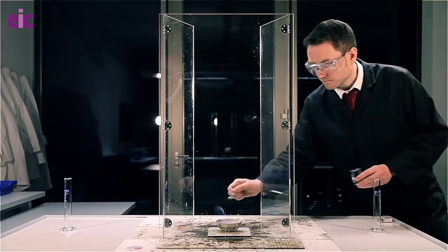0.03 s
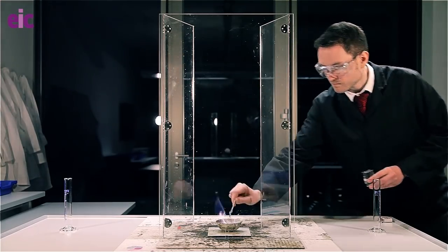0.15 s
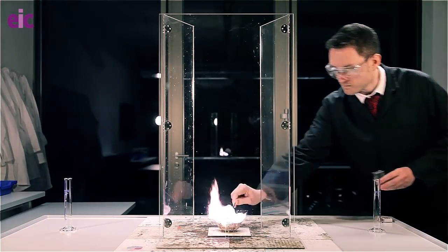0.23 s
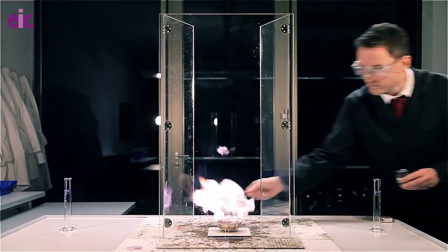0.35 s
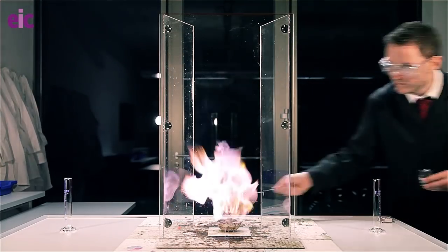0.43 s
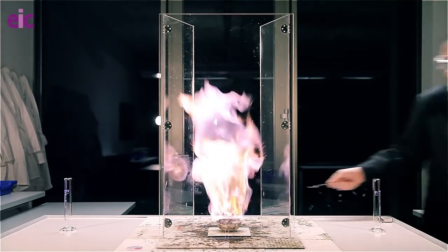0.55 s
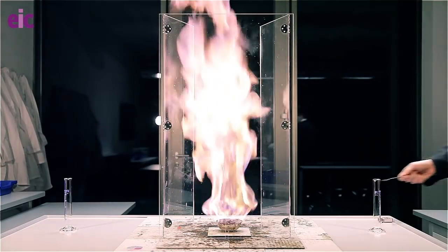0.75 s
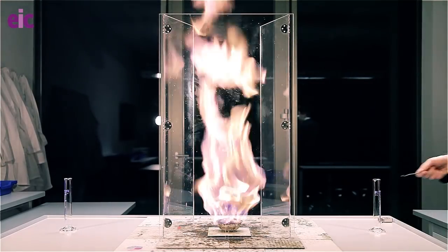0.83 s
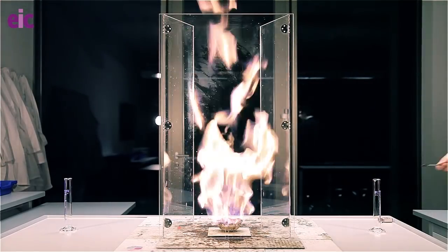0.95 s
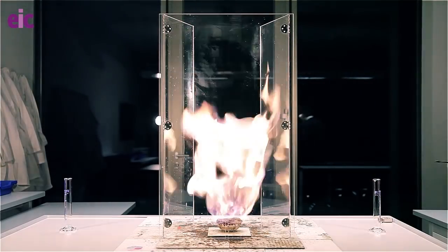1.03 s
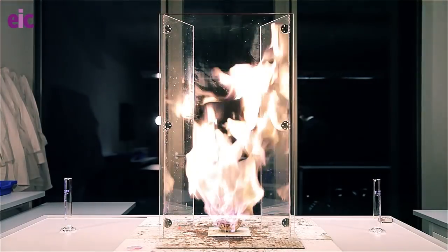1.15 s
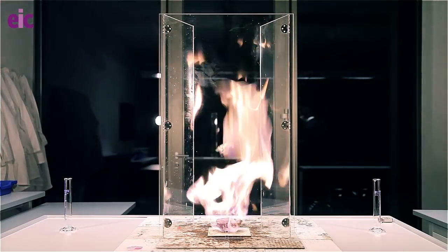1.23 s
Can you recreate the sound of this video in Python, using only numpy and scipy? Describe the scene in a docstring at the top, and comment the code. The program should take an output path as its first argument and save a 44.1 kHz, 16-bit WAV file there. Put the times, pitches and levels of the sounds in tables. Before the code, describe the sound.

A burst of flame ignites with a loud bang, then burns with a low, sizzling roar.

```python
"""A laboratory bench in a hard-walled room, one microphone near a dish of ethanol.
Over quiet room tone a brief fizz swells, then the vapour ignites with a bang that overloads the
microphone, slaps back from the walls and rings away. The flame burns on with a low, flapping roar
while the liquid in the dish sizzles in surges."""
import sys
import numpy as np
from scipy import signal
from scipy.fft import rfft, irfft
from scipy.io import wavfile

SR = 44100
rng = np.random.default_rng(int(sys.argv[2]) if len(sys.argv) > 2 else 0)


def dump_mix(stems):
    """Bounce the given channels to the path in sys.argv[1] as a 16-bit WAV at rate SR."""
    frames = np.atleast_2d(stems).T  # one column per channel
    limited = np.clip(frames, -1, 1)  # hard clip at full scale
    pcm = np.round(limited * 32767).astype(np.int16)
    wavfile.write(sys.argv[1], SR, pcm)


N = 57330
T = np.arange(N) / SR

# room tone spectrum: f/Hz, relative level/dB
ROOM_TONE_SPECTRUM = [(25, 1), (80, -7), (160, -8), (400, -14), (1000, -16.5), (2000, -15.5), (4000, -19.5),
                      (10000, -20.5), (16000, -27)]
# surges of the sizzle: t/s, relative level/dB
SIZZLE_SURGES = [(.0, -67.5), (.19, -55.5), (.21, -37), (.3, -32), (.43, -32), (.56, -36), (.68, -37),
                 (.77, -34), (.835, -39), (.88, -35.5), (.965, -35), (1.0, -40), (1.05, -40.5),
                 (1.072, -33.5), (1.1, -31.5), (1.15, -35.5), (1.23, -34), (1.3, -38.5)]
# sizzle spectrum: f/Hz, relative level/dB
SIZZLE_SPECTRUM = [(600, 4), (1200, -2), (2000, 3.5), (3000, -4.5), (4500, -3), (6600, 0), (7700, 3),
                   (11000, 2), (13300, -1), (15000, -13), (16000, -14)]
# jets of vapour: t/s, length/s, level/dB, centre f/Hz, bandwidth/Hz
VAPOUR_JETS = [(0.904, 0.042, -37, 8300, 1600), (1.106, 0.067, -42, 4900, 2600),
               (0.95, 0.025, -44.5, 2150, 130)]
# snaps of the spreading flame front: t/s, level/dB
FRONT_SNAPS = [(0.2284, -6.5), (0.2318, -15.5), (0.2367, -6.5), (0.2393, -17)]
# snap spectrum: f/Hz, relative level/dB
SNAP_SPECTRUM = [(800, -14), (2000, 12), (4000, -1.5), (8000, -3.5), (12000, -11.5), (16000, -26)]
# tearing crack of the flame front: f/Hz, relative level/dB
CRACK_SPECTRUM = [(30, -8), (75, -3), (150, -11), (400, 2.5), (850, -11), (1250, -2), (1600, -7.5),
                  (2200, -6), (3500, -14.5), (6000, -25), (10000, -22.5), (16000, -37)]
# pressure pulses of the ignition: t/s, peak level/dB, f/Hz
IGNITION_PULSES = [(0.2301, 8, 446), (0.2374, 10, 248), (0.245, 1.5, 226)]
# slaps off the walls: t/s, peak level/dB, f/Hz
WALL_SLAPS = [(0.2617, -4, 343), (0.2695, -7, 343), (0.2844, -3, 245), (0.2956, -10, 260), (.307, -3, 210),
              (0.3561, -4.5, 276), (0.405, -7.5, 305), (.533, -21, 200)]
# reverberation spectrum: f/Hz, relative level/dB
REVERB_SPECTRUM = [(30, -48), (60, -31), (90, -15), (130, -12), (260, -1), (340, 1), (420, -2), (560, -4),
                   (720, -12.5), (930, -22), (1150, -12.5), (1550, -18), (2050, -15.5), (2600, -20.5),
                   (3000, -27), (3600, -24), (5000, -34), (10000, -38.5), (16000, -48)]
# reverberation time: f/Hz, T60/s
REVERB_T60 = [(100, 2.5), (260, 1.11), (700, 1.44), (2000, 1.49), (5000, 1.54), (12000, 0.34)]
# modes of room and safety screen: f/Hz, level from the bang/dB, T60/s, relative level from the flame/dB
RESONANCES = [(121.34, -35, 0.84, -3), (160, -20, 0.7, -1.5), (221.5, -20, 0.84, -2.5),
              (243, -14.5, 0.99, 0.5), (284.7, -19, 0.76, -11), (329.5, -12, 0.62, -3.5),
              (408, -18.5, 1.06, -28), (524.5, -16.5, 0.58, -9), (634.5, -22, 0.65, -11.5),
              (776, -32.5, 2.02, -28), (1132, -30.5, 1.53, -41), (1923, -24, 0.66, -33),
              (2020, -23.5, 0.67, -24), (2250, -44, 1.6, -34)]
# strength of the burning: t/s, relative level/dB
BURN_STRENGTH = [(.05, -56.5), (.14, -56), (.2, -61), (.25, -27), (.6, -30), (.82, -30), (.93, -30.5),
                 (1.025, -28.5), (1.06, -29), (1.12, -27), (1.2, -27.5), (1.3, -29.5)]
# flame spectrum: f/Hz, relative level/dB
ROAR_SPECTRUM = [(25, -12), (60, -6), (120, -1), (250, -3), (340, 0), (470, -13.5), (590, -7.5),
                 (750, -13.5), (1000, -24.5), (2500, -33.5)]
# flaps of the flame: t/s, peak level/dB, f/Hz
FLAME_FLAPS = [(.6503, -15.5, 342), (0.6966, -17.5, 240), (.998, -13, 144), (1.0055, -18, 134),
               (1.0715, -18, 160), (1.246, -20, 254)]

ROOM_TONE_DB = -49
SIZZLE_DB, SIZZLE_FLICKER_DB = 0.5, 1
IGNITION_S, CRACK_DB = .228, -9
PUSH_S, PUSH_DB, PUSH_WIDTH_S = .238, -4, .0024   # slow push of air under the main pulse
SLAP_CYCLES = 0.75   # the walls smear each pulse into a short ring
REVERB_DB, REVERB_BUILD_S = -11, .02
ROAR_DB, ROAR_FLUTTER_DB, ROAR_RING_DB = -3, 0.5, -2
OVERLOAD, CUTOFF_HZ = 1.0, 15750


def from_db(db):
    """Decibels to gain."""
    return 10 ** (np.asarray(db) / 20)


def unit_power(x):
    """Scale to an RMS of 1."""
    return x / np.sqrt(np.mean(x ** 2) + 1e-20)


def gain_curve(rows):
    """A level curve as gain per sample."""
    return from_db(np.interp(T, *np.transpose(rows)))


def at_hz(points, hz):
    """Read a table on a log-frequency axis."""
    f, value = np.transpose(points)
    return np.interp(np.log(np.maximum(hz, 1)), np.log(f), value)


def drift(hz):
    """Slow random wander with a spread of 1."""
    step, settle = 40, 2000
    pole = np.exp(-2 * np.pi * hz * step / SR)
    white = rng.standard_normal(N // step + settle + 2)
    slow = signal.lfilter([1], [1, -2 * pole, pole * pole], white)[settle:]
    return np.interp(np.arange(N) / step, np.arange(len(slow)), unit_power(slow))


def noise(spectrum):
    """Steady noise of a given spectrum, unit power."""
    hz = np.arange(N // 2 + 1) * SR / N
    return unit_power(irfft(rfft(rng.standard_normal(N)) * from_db(at_hz(spectrum, hz)), N))


def ring(x, hz, t60):
    """A resonator: a unit click starts a decaying sine of height 1."""
    r, w = from_db(-60 / (t60 * SR)), 2 * np.pi * hz / SR
    return signal.lfilter([0, np.sin(w)], [1, -2 * r * np.cos(w), r * r], x + 1e-18)


def burst(rise_s, hold_s, t60):
    """Rise, hold and decay, counted from the ignition."""
    age = T - IGNITION_S
    return np.clip(age / rise_s, 0, 1) * from_db(-60 * np.maximum(age - hold_s, 0) / t60)


def room_tone():
    """The laboratory's faint, steady air."""
    return from_db(ROOM_TONE_DB) * noise(ROOM_TONE_SPECTRUM)


def sizzle():
    """In the dish, boiling liquid hisses in surges and spurts narrow-band jets of vapour."""
    flicker = from_db(SIZZLE_DB + SIZZLE_FLICKER_DB * drift(hz=45))
    out = flicker * gain_curve(SIZZLE_SURGES) * noise(SIZZLE_SPECTRUM)
    for s, length, db, hz, width in VAPOUR_JETS:
        band = signal.butter(2, [hz - width / 2, hz + width / 2], "band", fs=SR, output="sos")
        hiss = unit_power(signal.sosfilt(band, rng.standard_normal(N)))
        out += from_db(db) * np.exp(-2 * ((T - s) / length) ** 2) * hiss
    return out


def bang(snap_t60=.019):
    """The vapour ignites, heard direct: snaps and heavy pulses in a swelling crack, over a push of air."""
    snap_envelope = sum(from_db(db - 60 * np.abs(T - s) / snap_t60) * (T > s) for s, db in FRONT_SNAPS)
    snaps = noise(SNAP_SPECTRUM) * snap_envelope
    crack = from_db(CRACK_DB) * noise(CRACK_SPECTRUM) * burst(rise_s=.0064, hold_s=.016, t60=.08)
    pulses = np.zeros(N)
    for s, db, hz in IGNITION_PULSES:
        u = (np.pi * hz * (T - s)) ** 2
        pulses += from_db(db) * (1 - 2 * u) * np.exp(-u)   # a peak between two troughs
    push = -from_db(PUSH_DB) * np.exp(-((T - PUSH_S) / PUSH_WIDTH_S) ** 2)
    return snaps + crack + pulses + push


def reverberation():
    """The bang fills the hard room; the diffuse tail dies octave by octave."""
    wash = rfft(noise(REVERB_SPECTRUM))
    hz = np.arange(N // 2 + 1) * SR / N
    octave = np.round(np.log2(np.maximum(hz, 32)))
    tail = np.zeros(N)
    for k in np.unique(octave):
        band = irfft(wash * (octave == k), N)
        tail += band * burst(REVERB_BUILD_S, REVERB_BUILD_S, at_hz(REVERB_T60, 2 ** k))
    return from_db(REVERB_DB) * tail


def room_ring():
    """The bang strikes the modes of the room and the safety screen."""
    out = np.zeros(N)
    for hz, db, t60, _ in RESONANCES:
        arrival_s = IGNITION_S + REVERB_BUILD_S * (1 + rng.random() / 2)
        click = np.arange(N) == int(arrival_s * SR)
        out += ring(from_db(db) * click, hz, t60)
    return out


def wall_slaps():
    """The walls throw the bang back to the microphone as short, low rings."""
    out = np.zeros(N)
    for s, db, hz in WALL_SLAPS:
        cycles = hz * (T - s)
        out += from_db(db) * np.cos(2 * np.pi * cycles) * np.exp(-(cycles / SLAP_CYCLES) ** 2)
    return out


def flame():
    """Turbulent burning flutters, stirs the room's modes and now and then flaps."""
    roar = unit_power(noise(ROAR_SPECTRUM) * from_db(ROAR_FLUTTER_DB * drift(hz=16.7)))
    modes = sum(from_db(db) * unit_power(ring(roar, hz, t60)) for hz, _, t60, db in RESONANCES)
    ringing = from_db(ROAR_RING_DB) * unit_power(modes)
    out = from_db(ROAR_DB) * gain_curve(BURN_STRENGTH) * (roar + ringing)
    for s, db, hz in FLAME_FLAPS:
        phase = 2 * np.pi * hz * (T - s)
        out -= from_db(db) * phase * np.exp((1 - phase ** 2) / 2)   # a push, then a pull
    return out


def scene():
    """Dish and room as they reach the one microphone."""
    return (room_tone() + sizzle() + bang() + reverberation() + room_ring() + wall_slaps() + flame())[None]


def record(dry):
    """The microphone clips flat on the bang; a steep low-pass cuts the top."""
    clipped = np.clip(dry, -OVERLOAD, OVERLOAD)
    return signal.sosfilt(signal.ellip(10, .1, 80, CUTOFF_HZ, fs=SR, output="sos"), clipped)


dry = scene()
out = record(dry)
dump_mix(out)
```